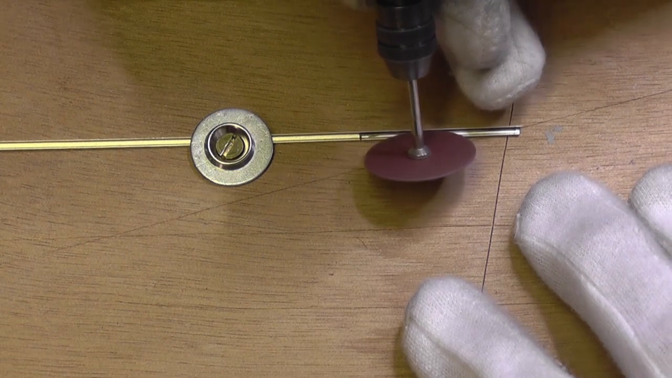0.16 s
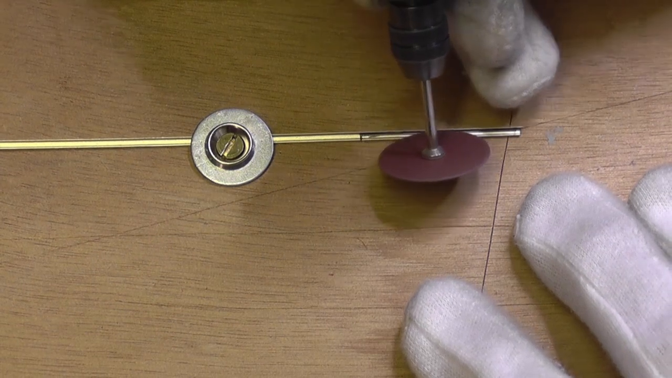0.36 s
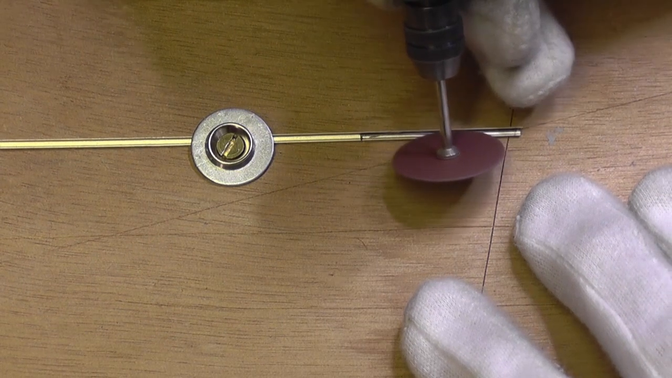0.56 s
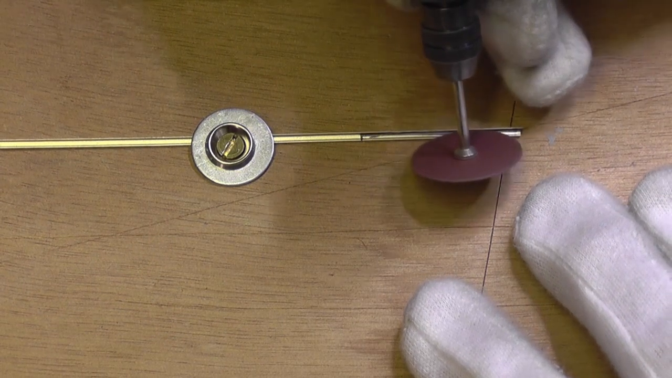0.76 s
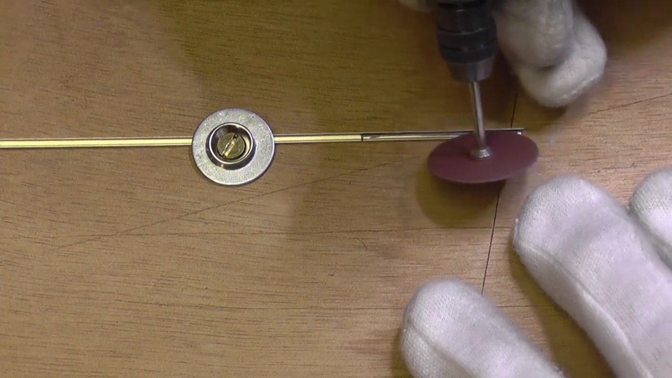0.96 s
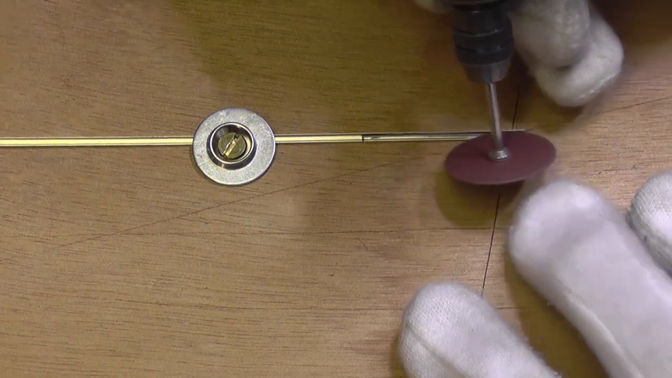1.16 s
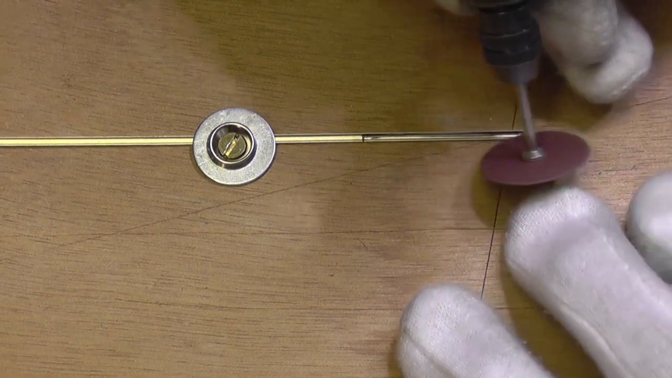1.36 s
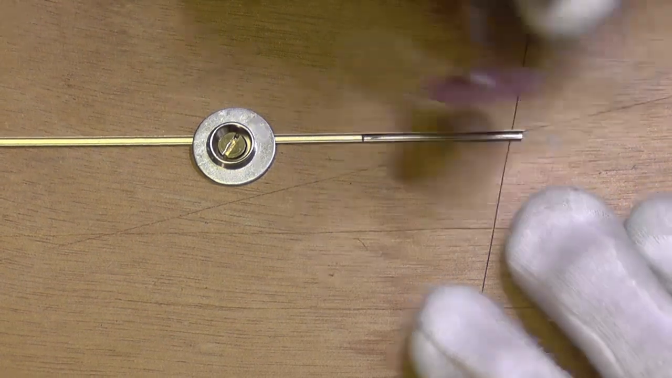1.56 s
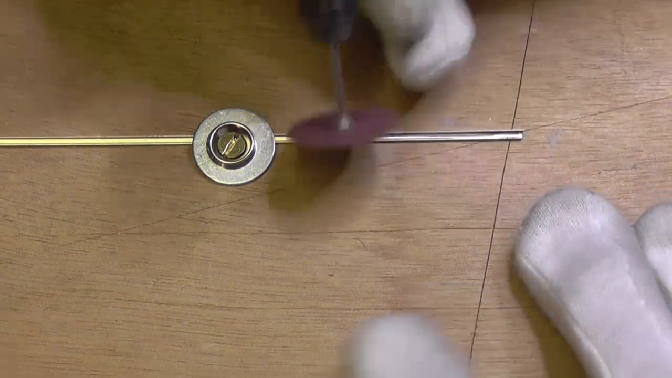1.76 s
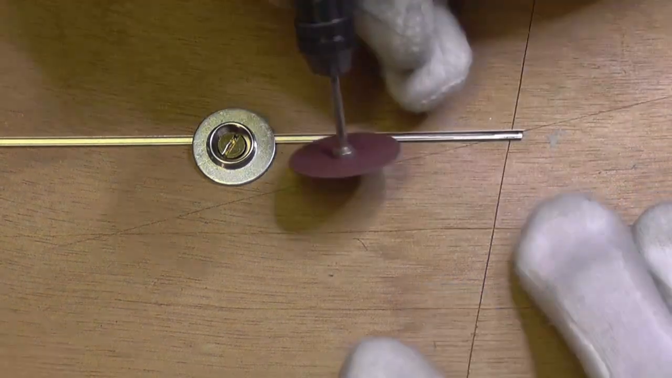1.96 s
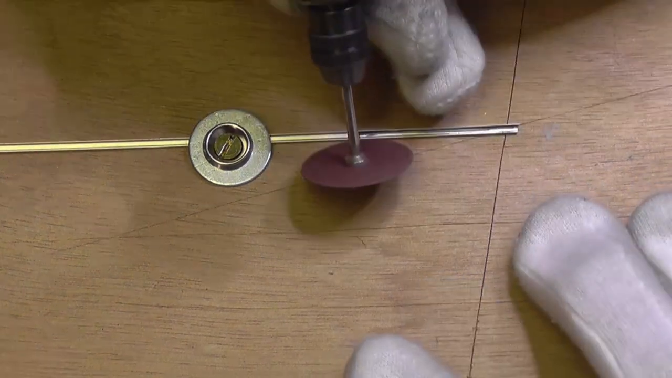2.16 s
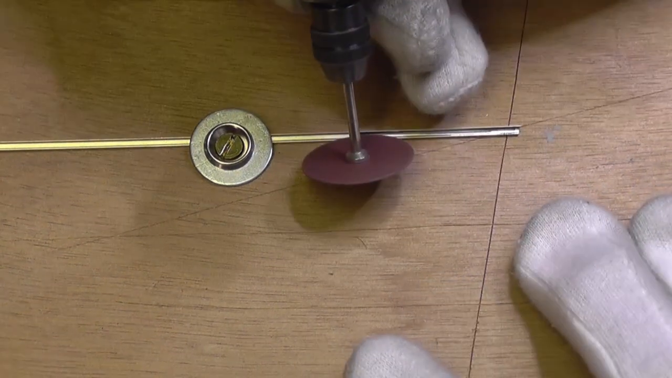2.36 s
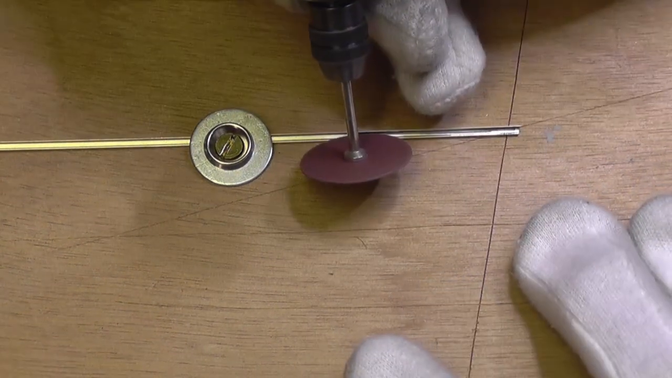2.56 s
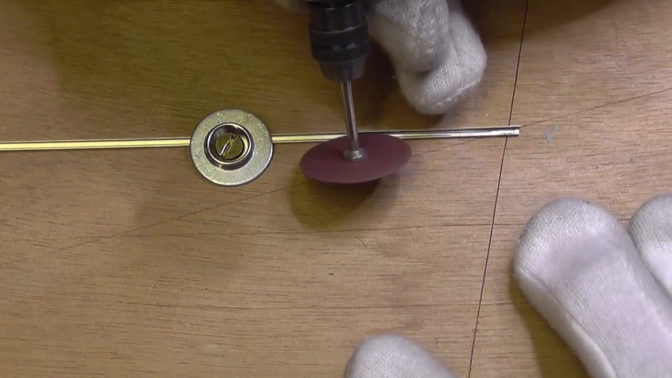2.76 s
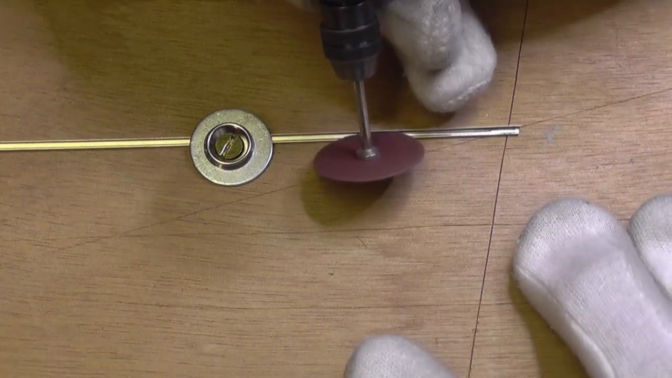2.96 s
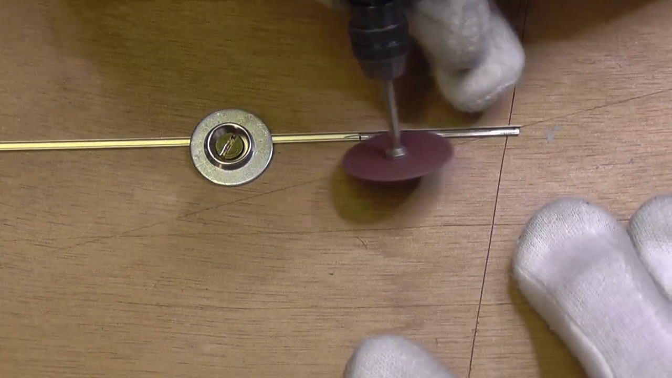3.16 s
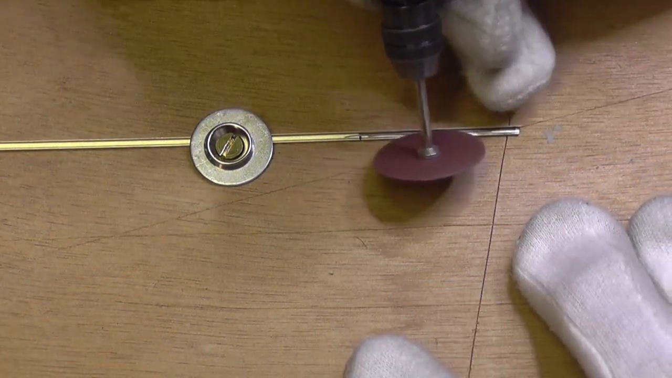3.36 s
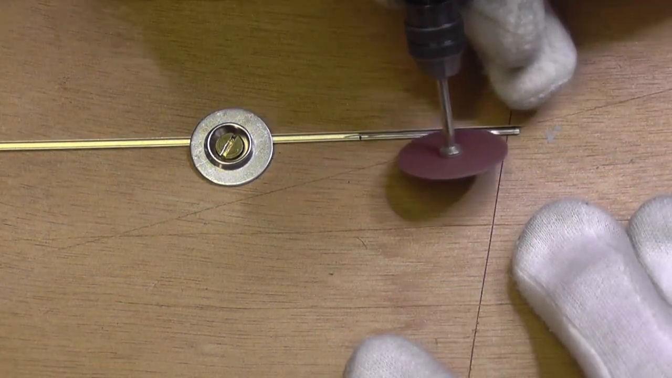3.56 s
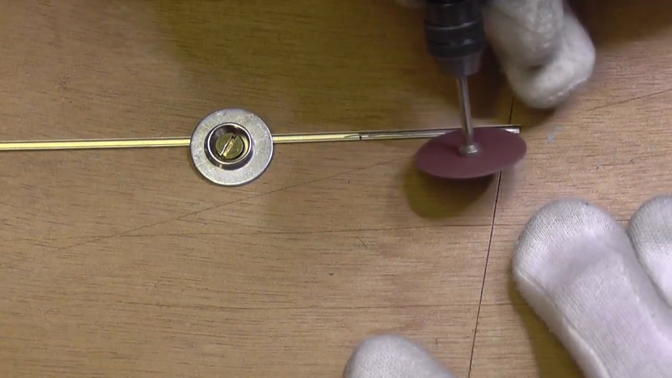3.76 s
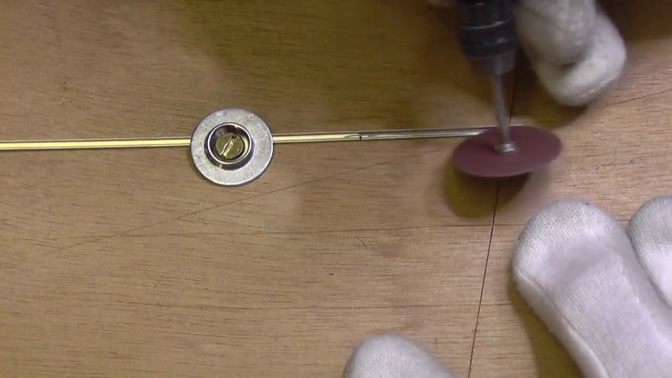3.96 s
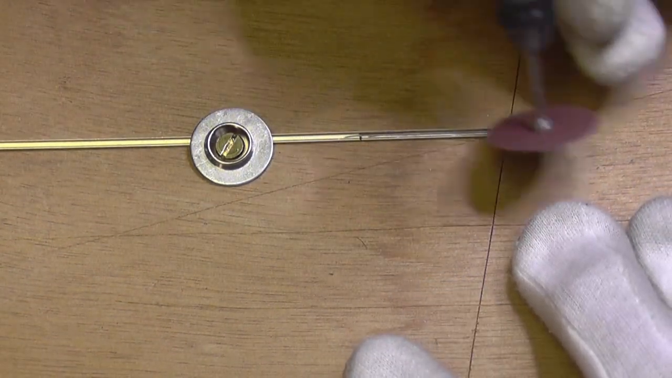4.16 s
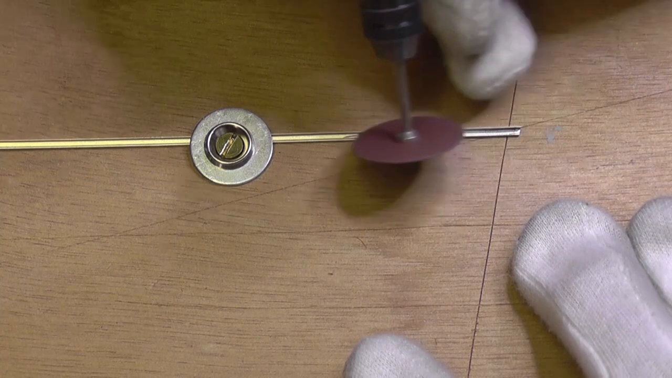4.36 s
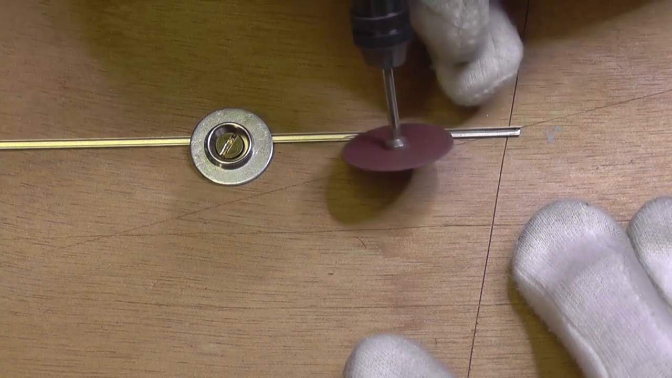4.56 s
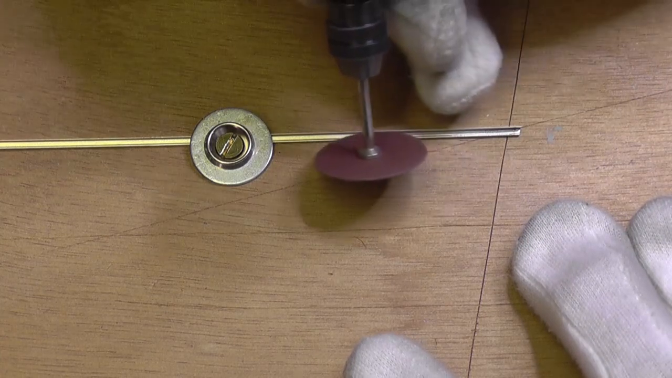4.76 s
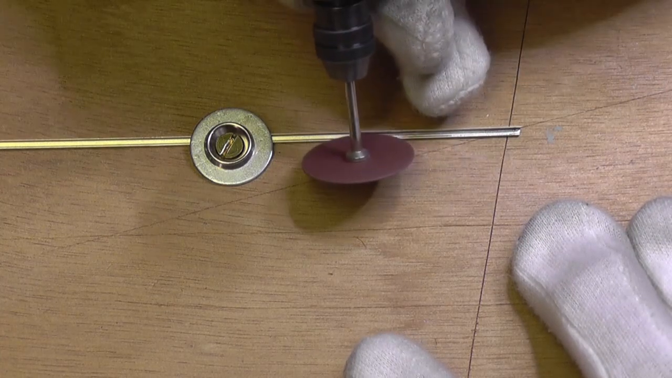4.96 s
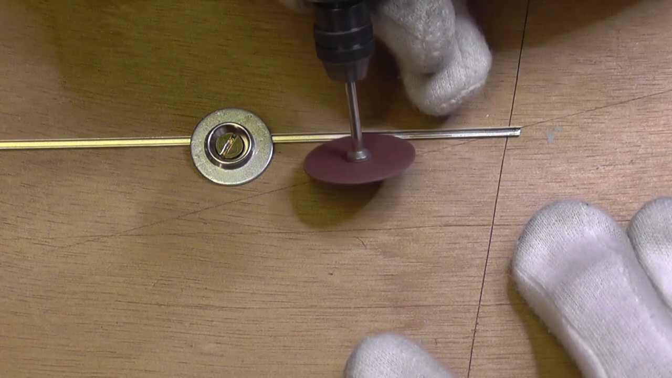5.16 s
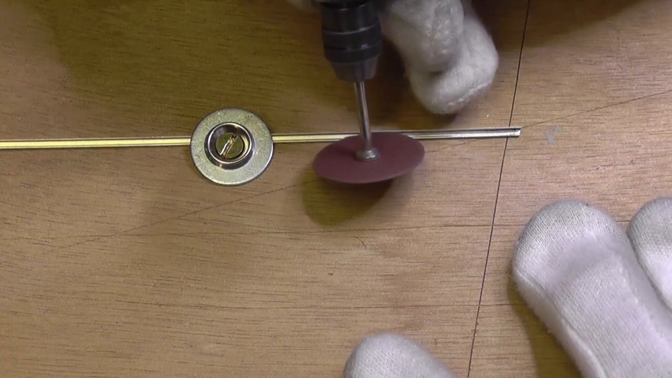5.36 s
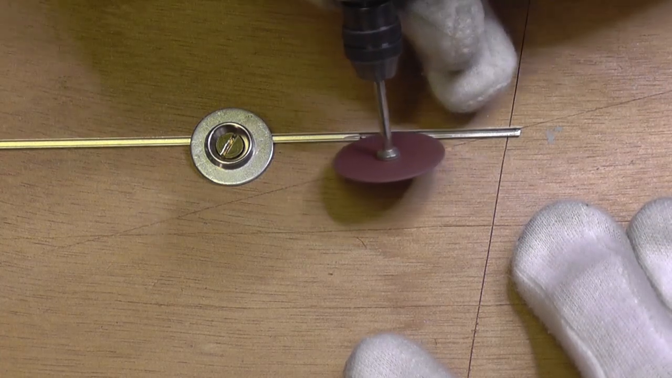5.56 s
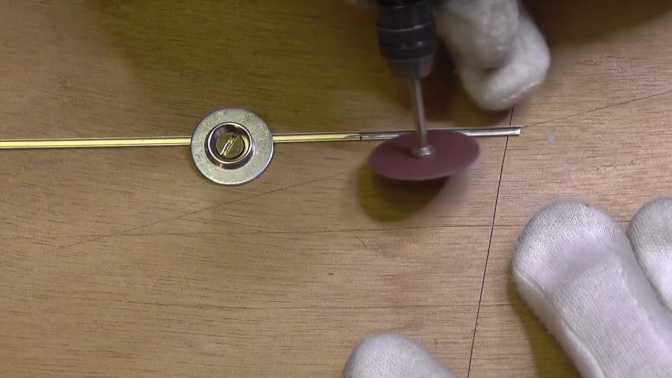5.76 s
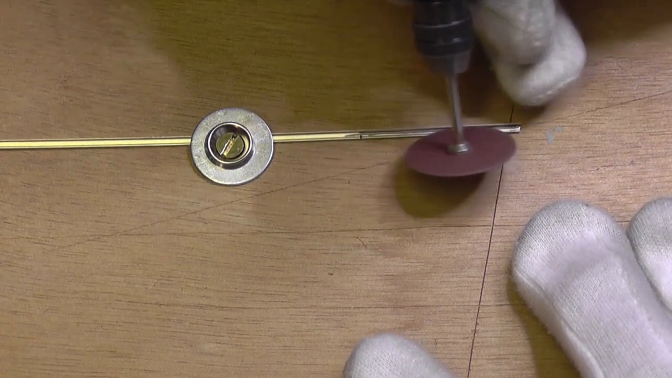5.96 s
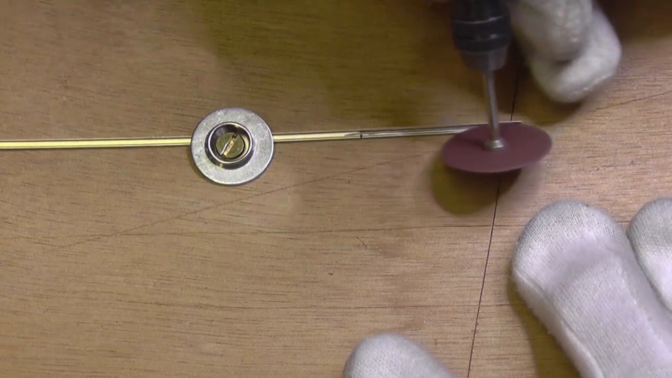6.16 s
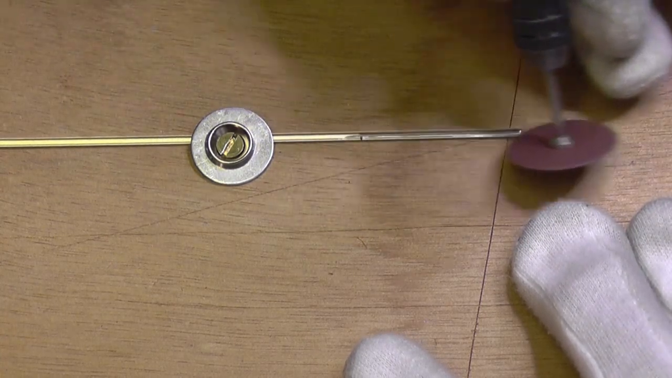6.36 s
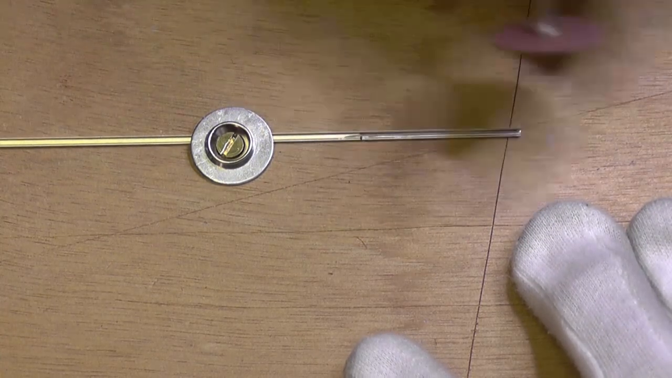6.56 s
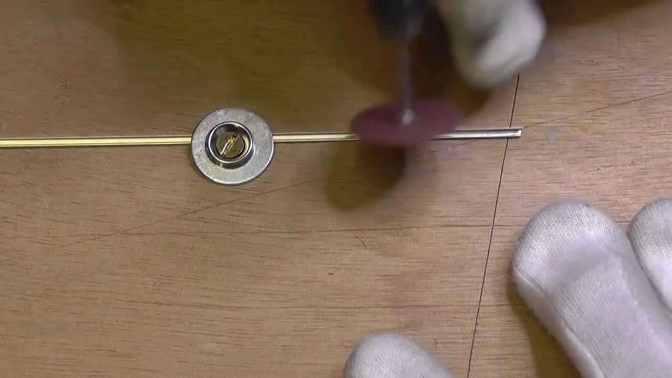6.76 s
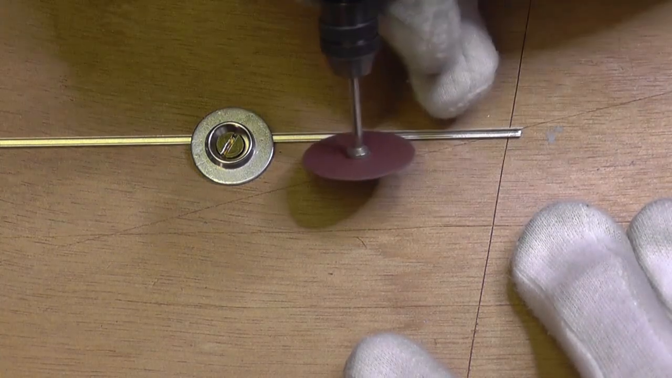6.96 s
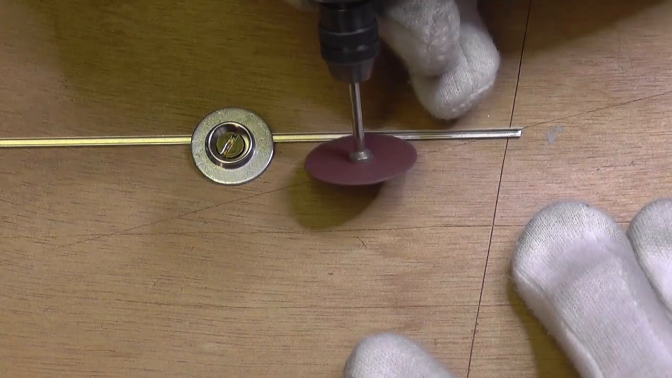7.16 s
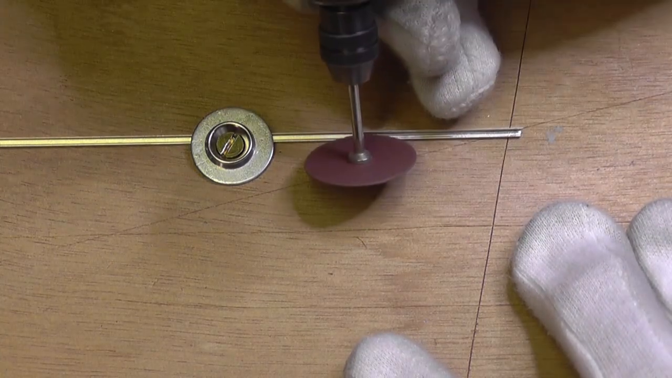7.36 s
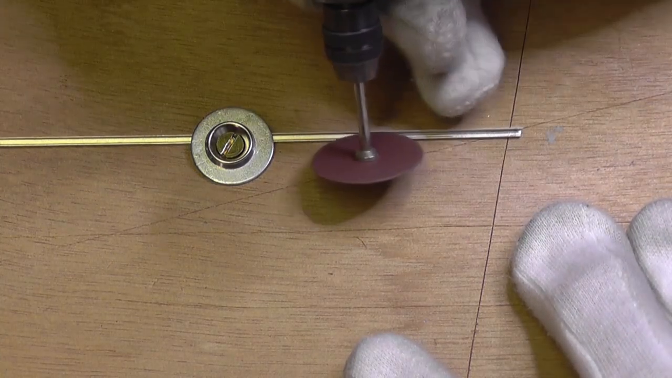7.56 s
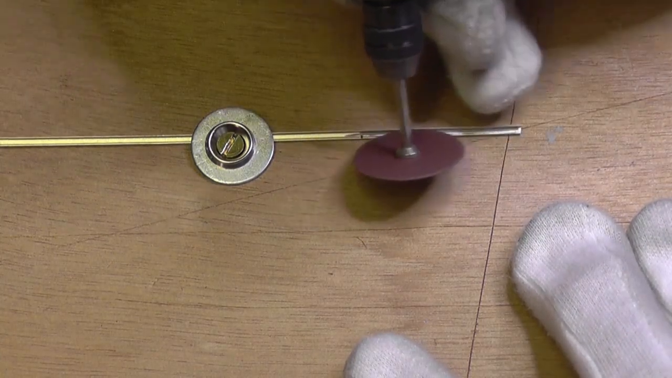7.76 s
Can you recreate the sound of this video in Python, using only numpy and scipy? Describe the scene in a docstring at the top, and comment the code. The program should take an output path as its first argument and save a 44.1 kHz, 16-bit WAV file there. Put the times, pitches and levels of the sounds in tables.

```python
"""A small mains rotary tool bites into a thin metal rail on a wooden bench, with a few dull knocks.
Its grit rasps once a turn, the push drags the motor down, and as the disc slides toward the tip,
narrow squeals and broad swells of rasp colour come and go. Lifted off, the motor spins up and whines.
Two harder passes follow, then a quick touch and a short last pass. The recorder's gain control
ducks under each pass and creeps back in the gaps."""
import sys
import numpy as np
from scipy import signal
from scipy.fft import rfft, irfft, next_fast_len
from scipy.io import wavfile
from scipy.ndimage import uniform_filter1d, map_coordinates

SR = 44100
rng = np.random.default_rng(int(sys.argv[2]) if len(sys.argv) > 2 else 0)


def output_pcm(signal):
    """Save a mono or channel-first signal as 16-bit PCM at the path in sys.argv[1].

    Samples are clipped to [-1, 1] before scaling.
    """
    pcm = np.clip(np.atleast_2d(signal).T, -1, 1) * 32767
    wavfile.write(sys.argv[1], SR, np.round(pcm).astype(np.int16))


N = 344421
TIME = np.arange(N) / SR

# the room's tail together with the rail's bright ring, against the dry sound: f/Hz, level/dB
TAIL_EQ = [(100, -10.5), (400, -14.5), (1200, -14), (2500, -22), (3700, -10.5), (5200, -9), (7000, -8.5),
           (9000, -19.5), (15000, -37)]
# sideways reflections off the bench against the dry sound: f/Hz, level/dB
REFLECTION_EQ = [(50, 4), (130, -5), (260, -6), (520, -13), (1100, -13), (2200, -59), (4500, -22.5),
                 (9000, -12), (14000, -11)]
# thuds from the landing disc and the hands: t/s, peak level/dB, low f/Hz, high f/Hz, decay/s
BENCH_KNOCKS = [(0.074, -26.5, 40.4, 300, 0.0092), (0.169, -30, 40, 353, 0.0088),
                (0.192, -24, 40, 358, 0.0055), (.296, -33, 50.4, 300, 0.0057),
                (.378, -28, 49.85, 303, 0.0092), (1.62, -44, 220, 420, .04),
                (1.761, -43, 158.7, 383, 0.026), (1.843, -44.5, 122, 258, .02),
                (1.95, -46, 108, 239, 0.042), (2.14, -45, 99.8, 262.3, 0.018),
                (2.658, -17, 40.5, 720, 0.0042), (2.66, -13, 40, 590, 0.0012),
                (5.226, -23, 30.03, 800, 0.0065), (6.458, -27.5, 435.7, 563.5, 0.025),
                (6.644, -42, 170.7, 285.6, 0.029), (7.382, -19, 30.44, 555, 0.0031),
                (7.454, -23, 80, 700, 0.0029)]
# mains buzz of the motor: f/Hz, level/dB
MAINS_HUM = [(100, -70.5), (300, -66)]
# tone of the cooling air: f/Hz, level/dB
AIR_EQ = [(60, -40), (250, -22.5), (540, -23), (800, -13), (1080, 2.5), (1380, -6.5), (1500, -12),
          (1640, -9.5), (1770, -13), (1930, -10), (2100, -17), (2300, -17), (2850, -11), (3700, -21),
          (5000, -19.5), (10500, -19), (13000, -28), (16000, -36)]
# tone of the brush hiss: f/Hz, level/dB
BRUSH_EQ = [(3000, -19.5), (4500, -9), (5100, -8), (6000, -19), (6800, 1.5), (7300, 4.5), (8100, -18.5),
            (9000, -11), (9600, -7), (10400, -4.5), (11500, -13), (13000, -18), (16000, -10)]
# whine of the free-running tool: multiple of shaft speed, level/dB
WHINE_PARTIALS = [(1, -21), (2, -24), (3, -21.5), (4, -11), (5, 1.5), (6, 0), (7, -10.5), (8, -7), (9, -7),
                  (10, -7), (13, -9), (14, -11.5), (15, -2.5), (17, -12), (19, -11), (20, -11), (21, -15),
                  (22, -13), (23, -6), (25, -9), (26, -13), (27, -14), (28, -20), (30, -13), (31, -13),
                  (32, -10), (33, -12), (34, -12), (35, -15), (36, -7.5), (37, -10), (38, -15), (39, -10),
                  (40, -16), (41, -15), (42, -11), (43, -14), (44, -4.5), (45, -20)]
# the unloaded tool speeds up as it warms and changes level as the hand turns it:
# t/s, speed/(turns/s), level/dB
IDLE_CURVE = [(1.6, 202.3, 4), (2.25, 202.3, 3.7), (2.65, 202.3, 2), (4.6, 205.3, 3.5), (5.05, 204.1, 3.5),
              (6.5, 205.6, 3.5), (6.85, 205.8, 3.8), (7.2, 205.4, 3.6)]
# the hand's push, as the speed it takes from the shaft: t/s, drag/(turns/s)
PUSH_CURVE = [(0.0, 15.5), (0.14, 28.6), (0.17, 19.2), (0.38, 15.3), (0.47, 25.0), (0.75, 32.9),
              (0.87, 19.4), (1.12, 36.4), (1.25, 21.8), (1.29, 36.1), (1.38, 2.1), (2.65, 3.6),
              (2.82, 31.0), (3.02, 71.7), (3.09, 55.8), (3.15, 70.0), (3.26, 53.0), (3.29, 74.6),
              (3.35, 86.3), (3.54, 99.3), (3.59, 95.4), (3.67, 116.8), (3.73, 93.9), (3.8, 112.4),
              (3.85, 88.8), (3.93, 92.2), (3.97, 65.6), (4.1, 44.6), (5.22, 11.0), (5.31, 30.9),
              (5.34, 15.1), (5.51, 43.4), (5.68, 75.8), (5.74, 63.3), (5.85, 88.6), (6.02, 95.9),
              (6.05, 107.5), (6.11, 89.5), (6.16, 105.2), (6.21, 106.6), (6.32, 59.6), (6.37, 66.6),
              (7.45, 29.2), (7.51, 15.3), (7.56, 35.7), (7.64, 30.1), (7.75, 73.8), (7.8, 79.3)]
# disc on the rail: touch t/s, lift t/s, attack/s, release/s, from place/mm, to place/mm,
# rasp level/dB, sizzle level against the rasp/dB
CONTACTS = [(-.1, 1.4, 0.01, 0.042, 5.9, 37, -10.5, -2), (2.654, 4.113, 0.0051, 0.041, 4.4, 33.3, -11.5, 1),
            (5.223, 6.398, .0035, 0.04, 5.77, 40.8, -11.3, 1),
            (7.375, 7.409, 0.0024, 0.0133, 2.5, 2.9, -15, 1),
            (7.446, 7.897, 0.0067, .02, 0.5, 10, -10.5, -0.5)]
# bench modes shaken by the turning disc: f/Hz, width/Hz, level/dB
BENCH_MODES = [(110, 25, -37), (174, 24, -30), (475, 100, -25), (720, 120, -30), (890, 100, -30)]
# broad tone of the rasp: f/Hz, level/dB
RASP_EQ = [(40, -27), (170, -32), (280, -32.5), (480, -31), (950, -15), (1400, -8.5), (3000, -9),
           (5800, -1), (7800, -5.5), (10200, 5), (12000, -2), (13700, -12), (15600, -14.5)]
# peaks and notches of rail, disc and bench: f/Hz, width/Hz, gain/dB
RAIL_EQ = [(1106, 127, -22.5), (1356, 250, 5), (1632, 89, 5.5), (1883, 180, -6.5), (2050, 94, 5),
           (2270, 110, -3), (2450, 130, 2), (2907, 430, 5.5), (3187, 130, -7.5), (3560, 200, 3.5),
           (4240, 160, 5), (4850, 140, -0.5), (6340, 230, 0.5), (6950, 260, -7.5), (8870, 600, 3.5),
           (9220, 280, -6), (10270, 3600, 3), (13950, 600, -8), (14960, 600, 8)]
# narrow rail modes that ring on as the disc lifts: f/Hz, width/Hz, gain/dB
RING_MODES = [(1663, 10.4, 0), (2436, 14, -1), (3560, 11, -7), (3865, 12, -6), (4240, 14, -11),
              (4620, 20, -8), (5370, 30, -2), (6395, 17, -10)]
# narrow squeals and broad swells of rasp colour as the disc slides along the rail:
# start t/s, end t/s, from f/Hz, to f/Hz, width/Hz, level against the rasp/dB
SQUEALS_AND_SWELLS = [(-.08, .56, 1665, 1655, 110, -10.5), (.164, .45, 2140, 2150, 200, -12),
                      (-.03, .17, 2600, 2500, 200, -10), (-.15, .95, 4170, 4270, 220, -6),
                      (-.05, 1.25, 5970, 5820, 240, -3.5), (.98, 1.22, 5850, 5800, 350, 0),
                      (.04, .2, 6120, 6200, 450, -3), (.303, .5, 7500, 7600, 300, -6),
                      (.42, .62, 2960, 2850, 70, -4), (.42, .62, 3700, 3550, 70, -11),
                      (.59, .8, 2990, 2910, 70, -9), (.77, .93, 2750, 2880, 80, -10),
                      (1.02, 1.22, 3000, 2860, 80, -9), (1.04, 1.2, 3500, 3380, 70, -10),
                      (1.302, 1.41, 1452, 1510, 400, -9), (.803, 1.08, 4510, 4670, 303, -3.5),
                      (.91, 1.36, 10340, 11100, 1520, 5), (.95, 1.238, 5400, 5400, 500, 2.5),
                      (1.218, 1.333, 5540, 5490, 200, .5), (1.29, 1.4, 3450, 3520, 157, -6),
                      (2.63, 2.797, 4260, 4250, 350, 0), (2.627, 2.905, 4640, 4660, 257, -3.5),
                      (2.67, 2.79, 1800, 1700, 200, -8), (2.717, 2.93, 3720, 3560, 200, -6),
                      (2.8, 3.608, 6220, 5930, 700, -1.5), (2.93, 3.27, 1640, 1560, 300, -9),
                      (3.283, 3.46, 1480, 1440, 350, -8.5), (3.322, 3.612, 9940, 10200, 600, 4),
                      (3.602, 3.88, 2440, 2320, 220, -3), (3.62, 3.97, 3150, 3200, 350, -8),
                      (3.74, 3.884, 2060, 2010, 170, -6), (3.72, 4.021, 5900, 5704, 700, -2),
                      (3.58, 4.08, 10300, 10300, 1000, .5), (3.904, 4.1, 1690, 1700, 200, -6.5),
                      (4.024, 4.123, 3588, 3600, 300, -7), (3.97, 4.11, 4700, 4720, 300, -6),
                      (5.2, 5.425, 4430, 4300, 420, -2.5), (5.3, 5.46, 1690, 1640, 90, -13),
                      (5.37, 5.5, 3740, 3560, 120, -9), (5.55, 5.805, 6160, 5800, 500, -3),
                      (5.6, 5.67, 3120, 3020, 100, -9), (5.63, 5.816, 1680, 1650, 110, -10.5),
                      (5.717, 6.106, 5376, 5272, 450, -2.5), (5.75, 6.08, 4350, 4000, 450, -5),
                      (5.879, 6.046, 2340, 2300, 260, -5), (5.85, 6.2, 1560, 1560, 450, -9.5),
                      (5.95, 6.25, 3150, 3150, 350, -9), (6.152, 6.34, 10100, 10360, 700, 2),
                      (6.22, 6.409, 1540, 1620, 350, -7.5), (6.299, 6.41, 4195, 4260, 900, -3),
                      (7.35, 7.42, 4147, 4200, 700, -2), (7.37, 7.42, 1524, 1500, 220, -5.5),
                      (7.43, 7.5, 5563, 5480, 180, -3), (7.43, 7.516, 4400, 4060, 400, -4.5),
                      (7.478, 7.603, 3920, 3730, 260, 0), (7.56, 7.65, 1480, 1425, 90, -8),
                      (7.62, 7.68, 1610, 1595, 110, -5), (7.578, 7.85, 5550, 5440, 200, -4.5)]

RIPPLE_HZ = 100  # swells of the mains current
STRAIN_DB, MOTOR_PAN_DB = 2.5, -0.7  # motor boost while on the rail; left minus right
# the layers of the grind follow the push (dB per turn/s of drag) and the place along the rail
GROWL_DB, GROWL_DB_PER_DRAG, GROWL_DB_PER_MM = -7.6, 0.0174, -0.0358
GROAN_DB, GROAN_DB_PER_DRAG, GROAN_DB_PER_MM = -1, 0.0192, -0.09
BUMPS_DB, BUMPS_DB_PER_DRAG = 1.5, 0.0164
FIZZ_DB, FIZZ_DB_PER_DRAG = -3, -0.1082
SIZZLE_DB_PER_MM = 0.1088
PAN_DB, PAN_DB_PER_MM = 0.7, -0.05  # left minus right
SIDE = np.array([[1], [-1]])  # plus on the left, minus on the right


def amp(db):
    """Decibels to linear gain."""
    return 10 ** (np.asarray(db) / 20)


def pan(db):
    """Stereo gains with the left db louder than the right."""
    return amp(db * SIDE / 2)


def unit(x):
    """Scale to rms 1."""
    return x / np.sqrt(np.mean(x ** 2) + 1e-20)


def automation(rows):
    """Each column of a time curve, at every sample."""
    times, *columns = np.transpose(rows)
    return [np.interp(TIME, times, column) for column in columns]


def at_hz(points, hz):
    """Read an EQ curve on a log-frequency axis."""
    freqs, levels = np.transpose(points)
    return np.interp(np.log(hz), np.log(freqs), levels)


def bell(hz, centre_hz, width_hz):
    """A resonance curve, 1 at its centre."""
    return 1 / (1 + (2 * (hz - centre_hz) / width_hz) ** 2)


def shaped(x, response):
    """Filter by a gain given as a function of frequency."""
    size = next_fast_len(N + SR // 2)
    hz = np.maximum(np.arange(size // 2 + 1) * SR / size, 1)
    return irfft(rfft(x, size) * response(hz), size)[..., :N]


def eq(x, points):
    """Filter by an EQ curve."""
    return shaped(x, lambda hz: amp(at_hz(points, hz)))


def drift(rate):
    """A smooth random modulator, rms 1, that changes about rate times a second."""
    points = rng.standard_normal(int(rate * N / SR) + 2)
    return unit(np.interp(TIME * rate, np.arange(len(points)), points))


def lagged(x, lag_s):
    """Follow a control with inertia."""
    r = np.exp(-1 / (lag_s * SR))
    return signal.lfilter([1 - r], [1, -r], x, zi=[r * x[0]])[0]


def rim(turns, lasting_turns, size):
    """A rough rim with size bumps passes once a turn and slowly wears into a new pattern."""
    wear = turns / lasting_turns
    bumps = rng.standard_normal((int(wear[-1]) + 3, size))
    return unit(map_coordinates(bumps, [wear, turns % 1 * size], order=3, mode="grid-wrap"))


def room_rumble():
    """A faint, wide bed of low room tone."""
    noise = rng.standard_normal((2, N))
    return amp(-64) * unit(shaped(noise, lambda hz: hz / np.hypot(hz, 80) / np.hypot(1, hz / 250)))


def room_and_rail_tail(x, t60=0.27):
    """A short diffuse tail of the room, together with the rail's bright ring after the disc lifts."""
    age = TIME[:SR // 2]
    tail = rng.standard_normal((2, len(age))) * amp(-60 * age / t60) * (age > .002)
    tail /= np.linalg.norm(tail, axis=1, keepdims=True)
    return eq(signal.fftconvolve(x[None], tail, axes=1)[:, :N], TAIL_EQ)


def early_reflections(x, t60=0.034):
    """Reflections off bench and hands reach the two microphone ports in opposite phase."""
    age = TIME[:SR // 8]
    echoes = rng.standard_normal(len(age)) * amp(-60 * age / t60)
    reflected = signal.fftconvolve(x, echoes / np.linalg.norm(echoes))[:N]
    return SIDE * eq(reflected, REFLECTION_EQ)


def knocks():
    """The wooden bench answers each bump with a short, dull thud."""
    out = np.zeros(N)
    age = TIME[:SR // 4]
    for start, db, low_hz, high_hz, decay_s in BENCH_KNOCKS:
        burst = rng.standard_normal(len(age)) * np.exp(-age / decay_s)
        thud = signal.sosfilt(signal.butter(2, [low_hz, high_hz], "band", fs=SR, output="sos"), burst)
        at = round(start * SR)
        out[at:at + len(age)] += (amp(db) * thud / np.abs(thud).max())[:N - at]
    return out


def shaft_speed(drag, inertia_s=.075, judder=.012):
    """Turns per second: the rotor follows the drag with a lag and judders the more it is braked."""
    lost = lagged(drag, inertia_s)
    free = automation(IDLE_CURVE)[0]
    return (free - lost) * (1 + 0.000494 * drift(25) + judder * lost / free * drift(70))


def whine(turns, speed, ripple, flutter_rad=0.88, full_flutter_hz=7100):
    """Shaft harmonics slide through the housing's resonances; the mains ripple shakes their phase."""
    pace = speed / speed.max()
    out = np.zeros(N)
    for k, db in WHINE_PARTIALS:
        housing = AIR_EQ if k < 20 else BRUSH_EQ
        housing_db = at_hz(housing, k * speed) - at_hz(housing, k * speed.max())
        flutter = flutter_rad * np.minimum(k * speed / full_flutter_hz, 1) ** 2 * ripple
        gain = pace ** (k / 10) * amp(db + housing_db + 0.75 * drift(14))  # the top needs full speed
        out += gain * np.sin(2 * np.pi * (k * turns + rng.random()) + flutter)
    return unit(out)


def brushes(turns, ripple):
    """The brushes scrape the same commutator each turn and spark with each swell of the current."""
    scrape = amp(3) * rim(turns, lasting_turns=25, size=144) + rng.standard_normal(N)
    scrape *= amp(2.4 * ripple + 2.2 * np.cos(2 * np.pi * turns))
    return unit(eq(scrape, BRUSH_EQ))


def motor(turns, speed):
    """Whine, fan air and brush hiss fade as the shaft slows, over a steady mains hum."""
    pace = speed / speed.max()
    ripple = np.cos(2 * np.pi * RIPPLE_HZ * TIME)
    tone = pace ** 1.4 * amp(-41) * whine(turns, speed, ripple)
    air = pace ** 0.6 * unit(eq(rng.standard_normal(N), AIR_EQ)) * amp(-43.5 + 1.76 * drift(60))
    hiss = pace * amp(-45.5) * brushes(turns, ripple)
    hum = sum(amp(db) * np.sin(2 * np.pi * hz * TIME) for hz, db in MAINS_HUM)
    return tone + air + hiss + hum


def strokes(ease=0.88, accent_db=3, accent_s=0.038):
    """The hand's gesture: contact (1 on the rail, 0 lifted), place/mm, rasp/dB and sizzle/dB."""
    rows = np.array(CONTACTS)
    current = np.searchsorted(rows[1:, 0], TIME)
    touch, lift, attack, release, from_mm, to_mm, rasp_db, sizzle_db = rows[current].T
    age = TIME - touch
    contact = (np.clip(age / attack, 0, 1) * np.clip((lift - TIME) / release, 0, 1)) ** 2
    place_mm = from_mm + (to_mm - from_mm) * np.clip(age / (lift - touch), 0, 1) ** ease
    landing_db = accent_db * np.exp(-age / accent_s)  # the grit bites harder as the disc lands
    return contact, place_mm, rasp_db + landing_db / 2, sizzle_db + landing_db


def bench_shudder(contact, release_s=.14):
    """The bench rumbles under the disc and on after it lifts, differently at each microphone port."""
    envelope = np.maximum(contact, lagged(contact, release_s)) * amp(-43 + 3.5 * drift(29))
    noise = rng.standard_normal((2, N))
    return envelope * unit(shaped(noise, lambda hz: 1 / np.hypot(1, (hz / 220) ** 2)))


def groan(turns, speed):
    """The disc runs out of true; each low harmonic swells as it passes a bench mode."""
    out = np.zeros(N)
    for k in range(1, 10):
        swell = sum(amp(db) * bell(k * speed, hz, width_hz) for hz, width_hz, db in BENCH_MODES)
        waver = amp(2.0 * drift(25) + 2.4 * drift(5))
        out += swell * waver * np.sin(2 * np.pi * (k * turns + 0.07 * drift(90)))
    return out


def rail_ring(rub):
    """The rail stores a little of the rubbing in its narrow modes."""
    out = np.zeros_like(rub)
    for hz, width_hz, db in RING_MODES:
        r = np.exp(-np.pi * width_hz / SR)
        feedback = [1, -2 * r * np.cos(2 * np.pi * hz / SR), r * r]
        out += amp(db) * (1 - r * r) / 2 * signal.lfilter([1, 0, -1], feedback, rub)
    return out


def squeals_and_swells(rub, fade_share=0.17, steadiness=0.3):
    """Narrow squeals and broad swells of rasp colour rise, glide and fade as the disc slides along."""
    out = np.zeros(N)
    for start, end, from_hz, to_hz, width_hz, db in SQUEALS_AND_SWELLS:
        span = (TIME > start) & (TIME < end)
        t = TIME[span]
        glide_hz = np.interp(t, [start, end], [from_hz, to_hz])
        carrier = np.exp(2j * np.pi * np.cumsum(glide_hz) / SR)
        # a band-pass that rides the glide: shift down, low-pass, shift back up
        band = signal.sosfilt(signal.butter(2, width_hz / 2, fs=SR, output="sos"), rub[span] / carrier)
        band *= carrier / (np.abs(band) + 1e-9) ** steadiness  # partly evens the level
        fade = np.clip(np.minimum(t - start, end - t) / (fade_share * (end - start)), 0, 1)
        out[span] += amp(db) * np.sin(np.pi / 2 * fade) * unit(band.real)
    return out


def grit(turns, drag, bump_boost_db=0, skid_turns=.003):
    """Coarse bumps repeat each turn; fine grains break at random, hardest where the disc runs high."""
    surface = rim(turns + skid_turns * drift(250), lasting_turns=16, size=120)
    bumps = shaped(surface, lambda hz: hz / np.hypot(hz, 1400) / np.hypot(1, hz / 4300))
    bumps *= amp(BUMPS_DB + BUMPS_DB_PER_DRAG * drag + bump_boost_db)
    crackle = rng.standard_normal(N) * amp(4.7 + 2.55 * drift(5000))
    grains = shaped(crackle, lambda hz: hz / np.hypot(hz, 2700))
    high_spots_db = 1.1 * np.cos(2 * np.pi * turns) + 0.46 * rim(turns, lasting_turns=9, size=7)
    return unit((bumps + grains) * amp(high_spots_db + 0.54 * drift(90)))


def rail_band(drive, low_hz, high_hz):
    """One band of the grit, coloured by rail, disc and bench, at rms 1."""
    def response(hz):
        peaks_db = sum(db * bell(hz, centre, width) for centre, width, db in RAIL_EQ)
        return amp(at_hz(RASP_EQ, hz) + peaks_db) * (hz >= low_hz) * (hz < high_hz)
    return unit(shaped(drive, response))


def grinding(turns, speed, drag, waver_db=0.9, waver_per_s=12, scatter_db=-15):
    """Grit drives the rail: darker with the push, thinner and further right toward the free tip."""
    contact, place_mm, rasp_db, sizzle_db = strokes()
    rasp_db += waver_db * drift(waver_per_s)  # the bite wavers in the hand
    growl_db = GROWL_DB + GROWL_DB_PER_DRAG * drag + GROWL_DB_PER_MM * place_mm
    growl_db += waver_db * drift(waver_per_s)
    sizzle_db += SIZZLE_DB_PER_MM * place_mm + waver_db * drift(waver_per_s)
    groan_db = GROAN_DB + GROAN_DB_PER_DRAG * drag + GROAN_DB_PER_MM * place_mm
    drive = grit(turns, drag)
    growl = amp(growl_db) * rail_band(drive, 0, 3250)
    rasp = amp(0.5) * rail_band(drive, 3250, 8000)
    scattered = drive + amp(scatter_db) * SIDE * grit(turns, drag)  # widens the top end
    sizzle = rail_band(scattered, 8000, 12600)
    fizz = amp(FIZZ_DB + FIZZ_DB_PER_DRAG * drag) * rail_band(scattered, 12600, np.inf)
    top = contact * amp(1.3 + sizzle_db) * pan(-2.6) * (sizzle + fizz)  # needs firm contact
    colour = squeals_and_swells(grit(turns, drag, bump_boost_db=1))
    layers = growl + rasp + top + colour + amp(groan_db) * groan(turns, speed)
    fader = amp(rasp_db) * pan(PAN_DB + PAN_DB_PER_MM * place_mm)
    return fader * (contact * layers + bench_shudder(contact))


def scene():
    """Tool, rail and bench close to a pair of microphone ports, over a faint room rumble."""
    contact = strokes()[0]
    drag = automation(PUSH_CURVE)[0] * contact
    speed = shaft_speed(drag)
    turns = np.cumsum(speed) / SR
    motor_db = automation(IDLE_CURVE)[1] + STRAIN_DB * contact
    tool = amp(motor_db) * pan(MOTOR_PAN_DB) * motor(turns, speed)
    grind = grinding(turns, speed, drag)
    direct = tool + grind + rail_ring(grind) + knocks()
    send = direct.mean(axis=0)
    return room_rumble() + early_reflections(send) + room_and_rail_tail(send) + direct


def gain_control(x, threshold_db=-23, slope=.93, release_db_per_s=16, attack_s=0.0039, ahead_s=0.0013):
    """The gain ducks quickly under a loud sound and creeps back at a steady rate."""
    power = uniform_filter1d(np.mean(x ** 2, axis=0), size=260)
    over_db = np.maximum(10 * np.log10(np.maximum(power, 1e-12)) - threshold_db, 0)
    recovery_db = release_db_per_s * TIME
    cut_db = np.maximum.accumulate(slope * over_db + recovery_db) - recovery_db
    return x * amp(-np.interp(TIME + ahead_s, TIME, lagged(cut_db, attack_s)))


def record(dry, cutoff_hz=15750):
    """Gain control, soft clipping, then a steep high cut."""
    clipped = 0.57 * np.tanh(gain_control(dry) / 0.61)
    return shaped(clipped, lambda hz: 1 / np.hypot(1, (hz / cutoff_hz) ** 120))


dry = scene()
out = record(dry)
output_pcm(out)
```